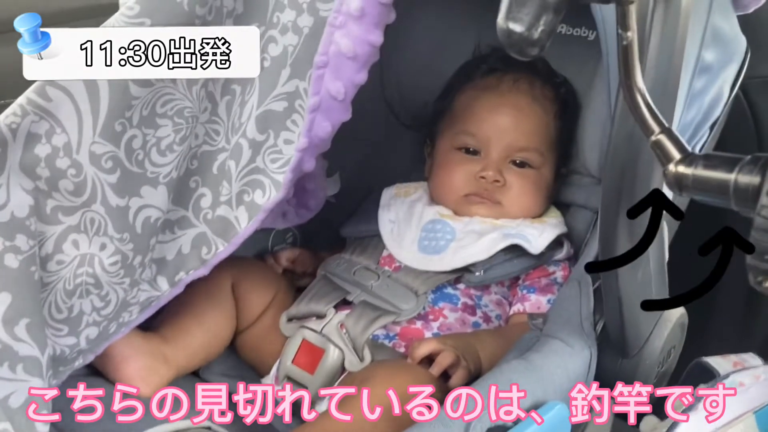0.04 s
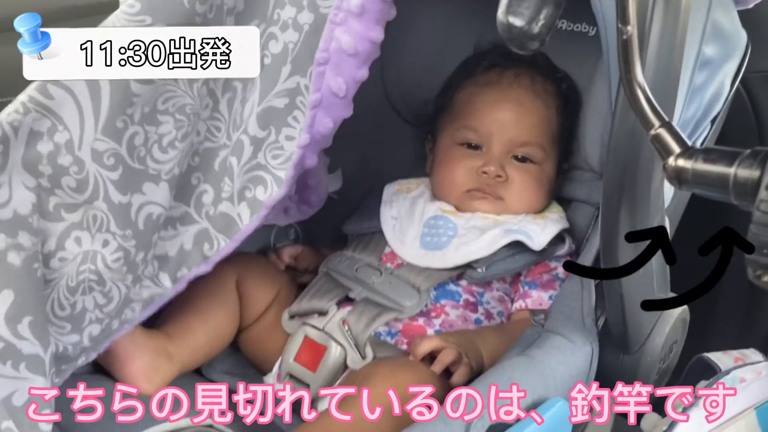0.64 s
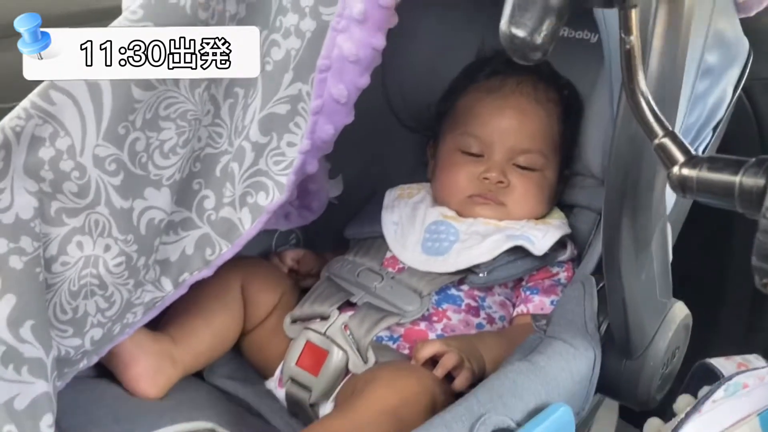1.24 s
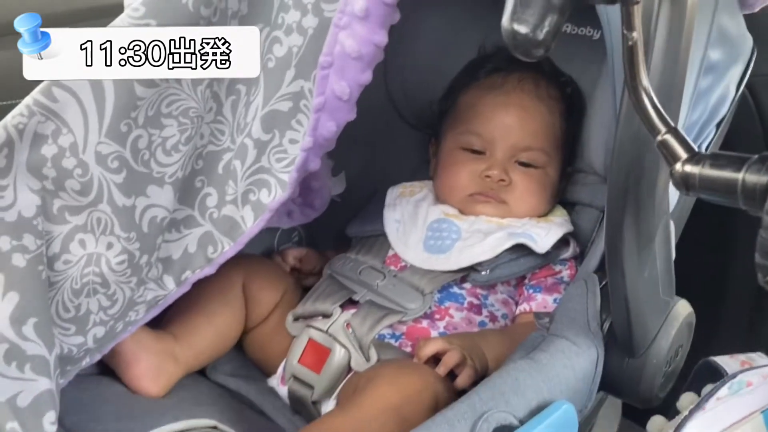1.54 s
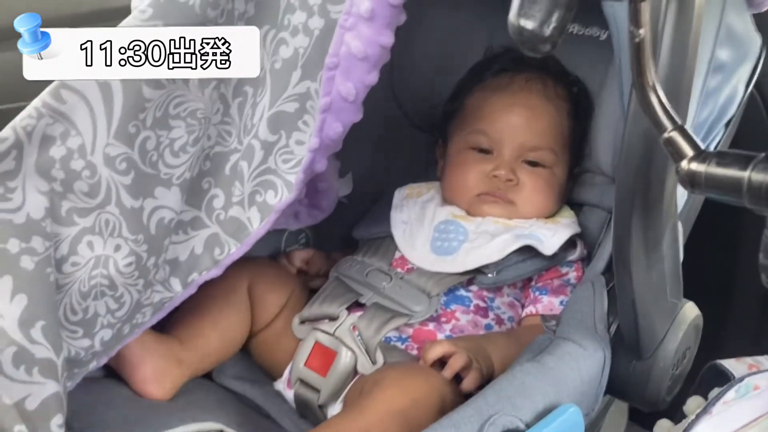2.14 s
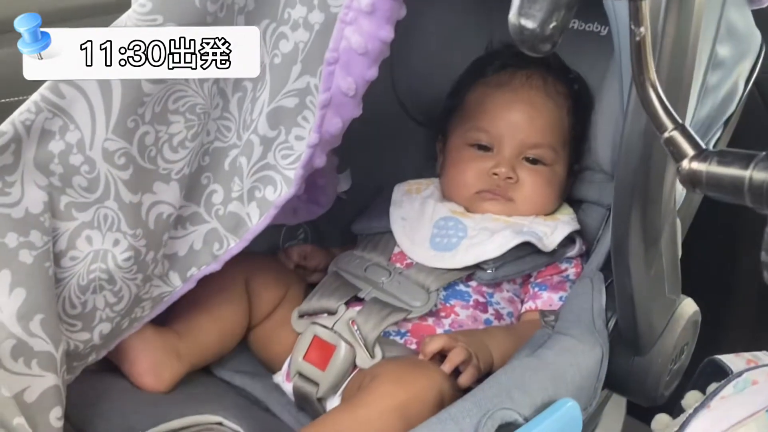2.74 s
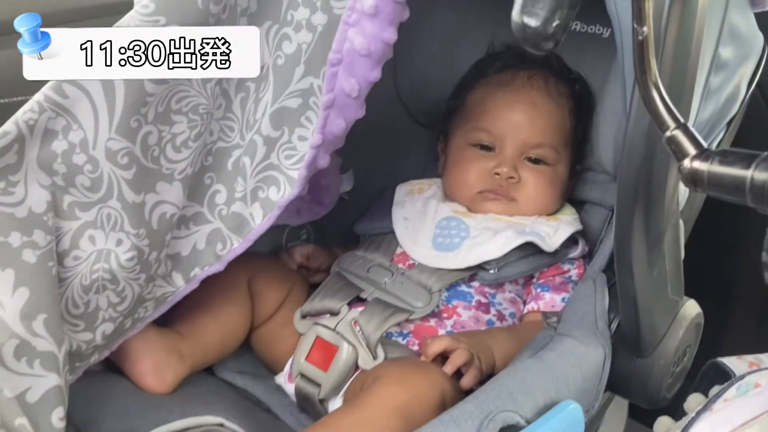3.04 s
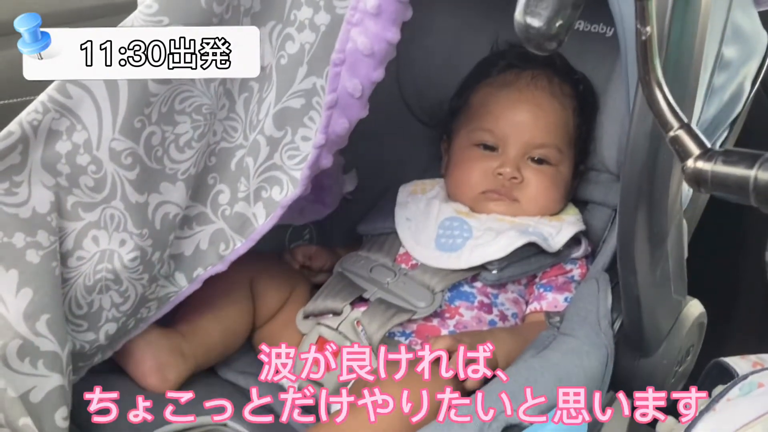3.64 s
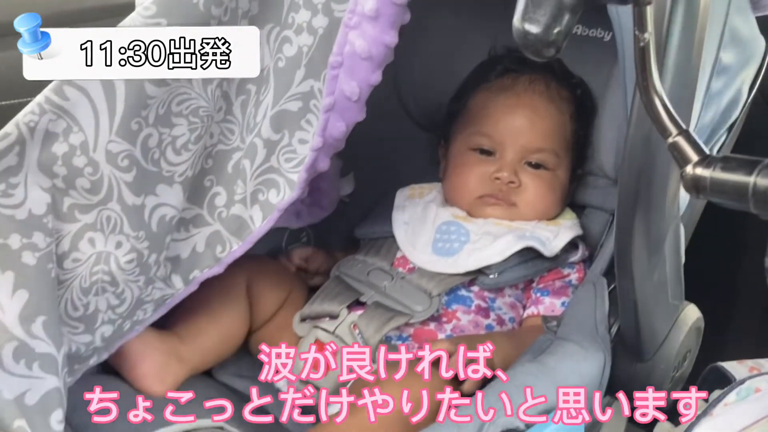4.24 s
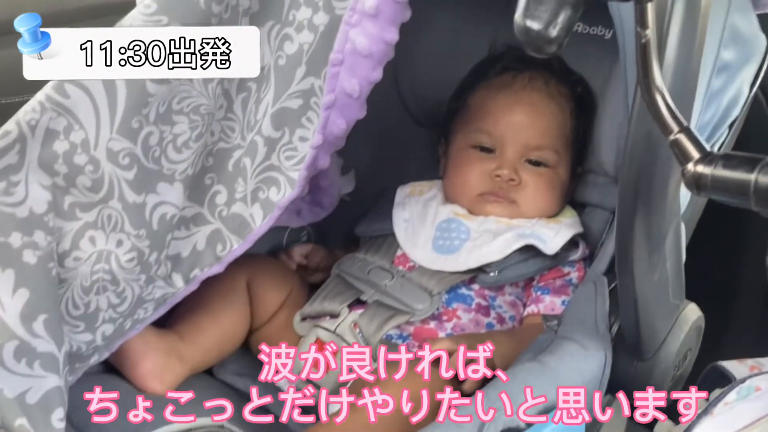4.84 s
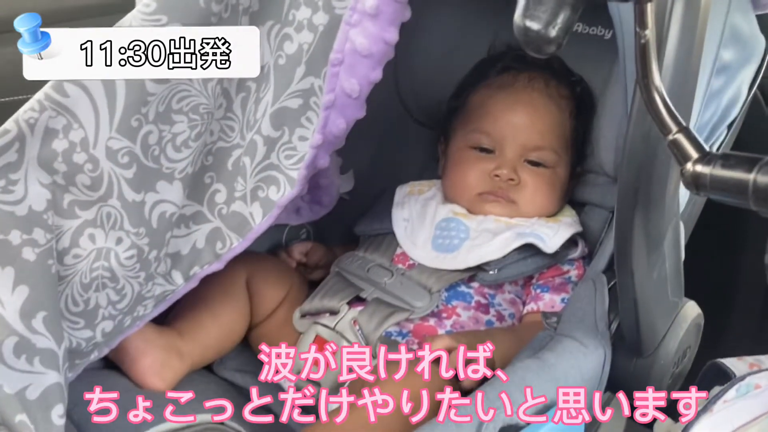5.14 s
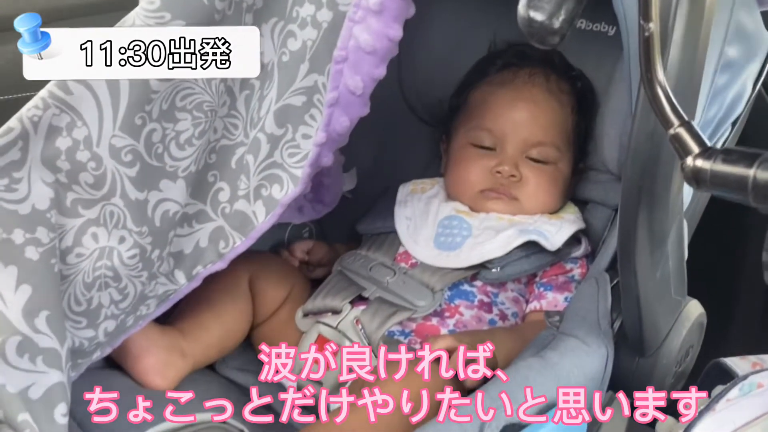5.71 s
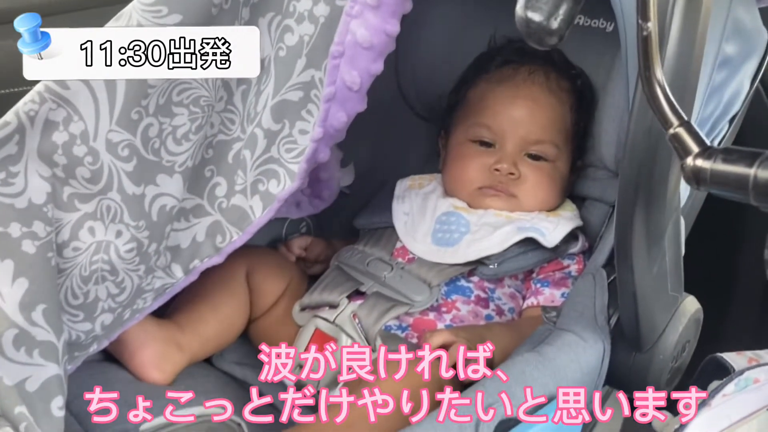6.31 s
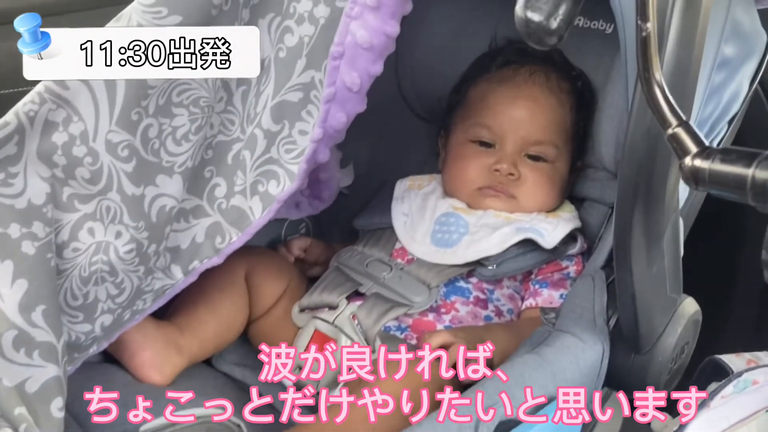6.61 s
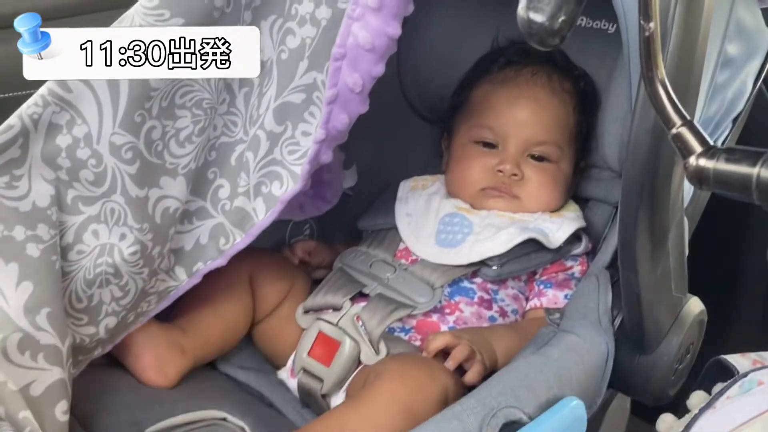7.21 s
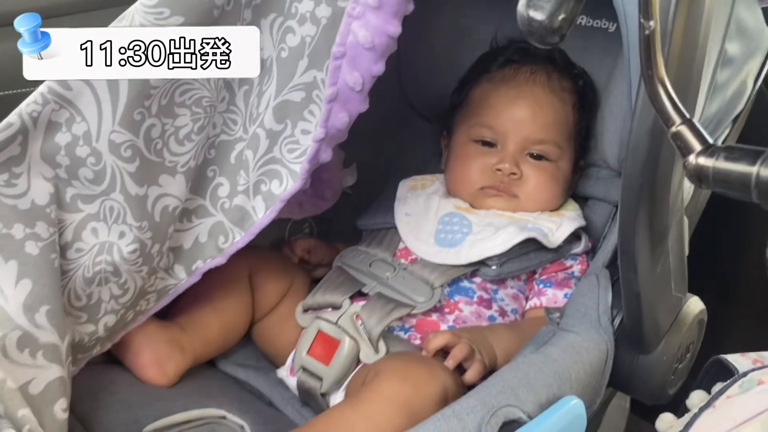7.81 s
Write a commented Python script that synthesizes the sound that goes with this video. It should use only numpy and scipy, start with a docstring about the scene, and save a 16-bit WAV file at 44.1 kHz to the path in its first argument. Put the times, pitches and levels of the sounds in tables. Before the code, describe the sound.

Inside a cruising car, heard from the back seat, a deep road rumble and low tyre hum run throughout, with softer wind roar and airy hiss behind. Near the start, plastic clicks once, sharply and close to the microphone. Midway the engine drone drops at a gear change, then swells again. Rough patches of road add soft low thumps, and the trim ticks very faintly now and then.

```python
"""Inside a cruising car

Road roughness shakes the body into a rumble, and the tyres hum at harmonics of their rotation.
The engine drone drops at an upshift, then swells as its pitch climbs into a cabin resonance.
Behind them lie wind roar and an airy hiss. Plastic clicks once close by, and the trim ticks faintly."""
import sys
import numpy as np
from scipy import signal
from scipy.fft import rfft, irfft
from scipy.io import wavfile

SR = 44100
rng = np.random.default_rng(int(sys.argv[2]) if len(sys.argv) > 2 else 0)


def wav_record(signal):
    """Record a signal, one row per channel, as 16-bit PCM in the file named by sys.argv[1]."""
    frames = np.transpose(np.atleast_2d(signal))
    bounded = np.clip(frames, -1, 1)
    # unit amplitude maps onto the largest positive 16-bit level
    quanta = np.round(bounded * 32767).astype(np.int16)
    wavfile.write(sys.argv[1], SR, quanta)


N = 351036
TIME = np.arange(N) / SR
BINS = np.fft.rfftfreq(N, 1 / SR)


# spectrum of the road rumble through the body: frequency_hz, relative_db
RUMBLE_SPECTRUM = [(20, -31), (32, -23), (46, -19), (68, 0), (80, -2), (115, 2), (140, -3), (175, -7.5),
                   (200, -12.5), (250, -9), (310, -12.5), (395, -13), (520, -26), (1400, -100)]
# rough patches of road: centre_s, level_db, half_length_s
ROUGH_PATCHES = [(0.78, -27.5, 0.075), (1.0, -30.5, 0.063), (2.6, -35, 0.63), (3.806, -31, .05),
                 (4.559, -27, .05), (6.28, -30, 0.16), (6.68, -26.5, .08)]
# spectrum of their boom through the suspension: frequency_hz, relative_db
PATCH_SPECTRUM = [(30, -32), (65, -0.5), (95, 2), (120, 0.5), (160, -12.5), (400, -58), (1200, -100)]

def road_rumble(smooth_db=-30.5, coarse_lift_db=0.96, bumps_db=0.5):
    """Structure-borne noise: the grain of the road shakes the body, and rough patches add a low boom."""
    grain_db = smooth_db + coarse_lift_db * coarseness() + bumps_db * drift(23)
    grain = amp(grain_db) * noise(colour(RUMBLE_SPECTRUM))
    patches = sum(amp(level_db) * np.exp(-0.5 * ((TIME - centre_s) / half_length_s) ** 2)
                  for centre_s, level_db, half_length_s in ROUGH_PATCHES)
    return grain + patches * noise(colour(PATCH_SPECTRUM))


# road speed, given as the pitch of the deepest tyre hum: time_s, pitch_hz
HUM_PITCH = [(0, 56.48), (2, 54.92), (5.5, 55.32), (7.96, 56.82)]
HUM_ORDER = 5  # cycles of that hum per wheel turn
# tones of the rolling tyres: cycles_per_turn, level_db
TYRE_ORDERS = [(5, -37), (6, -47), (15, -53), (20, -45), (25, -57.5)]

def tyre_hum(waver_db=0.7, coarse_db=2.1, smear_cycles=0.0225):
    """Rotational harmonics: uneven tyres hum at multiples of the wheel rate, louder on coarse asphalt."""
    turns = np.cumsum(curve(HUM_PITCH) / HUM_ORDER) / SR
    lift_db = coarse_db * (coarseness() - coarseness().mean())
    out = np.zeros(N)
    for order, mean_db in TYRE_ORDERS:
        pitch_ratio = order / HUM_ORDER
        level_db = mean_db + waver_db * pitch_ratio * drift(5.7) + np.sqrt(pitch_ratio) * lift_db
        smear = smear_cycles * pitch_ratio * drift(4)  # uneven rolling blurs the higher tones
        phase = 2 * np.pi * (order * turns + rng.random() + smear)
        out += amp(level_db) * unit(np.sin(phase))
    return out


# the driver's foot on the pedal: time_s, throttle_fraction
PEDAL = [(0, 1), (1.2, 0.73), (1.9, 0.11), (2.8, .32), (3.3, 1), (5.05, .05), (5.85, .66), (6.4, 0.26),
         (6.75, 0.54), (7.96, .5)]
# low air modes of the cabin: frequency_hz, width_hz, drone_level_db
BOOM_MODES = [(144, 7.5, -29), (166, 10.7, -38)]
LOW_GEAR, HIGH_GEAR = 14.85, 12.275  # firings per wheel turn, before slip
SHIFT_START_S, SHIFT_LENGTH_S, UNLOAD_DB, RELOAD_S = 3.35, 0.55, -14.5, 0.61

def engine_drone(full_throttle_slip=0.07, flutter_db=0.64, octave_db=-23):
    """Forced resonance: the firing tone swells near a cabin mode and sags as the upshift unloads it."""
    shifted = ease(SHIFT_START_S, SHIFT_LENGTH_S)
    gear = LOW_GEAR + (HIGH_GEAR - LOW_GEAR) * shifted
    slip = full_throttle_slip * curve(PEDAL)  # the engine runs ahead of the gearbox
    firing_hz = curve(HUM_PITCH) / HUM_ORDER * gear * (1 + slip)
    since_shift_s = np.maximum(TIME - SHIFT_START_S - SHIFT_LENGTH_S, 0)
    load_db = UNLOAD_DB * shifted ** 2 * np.exp(-since_shift_s / RELOAD_S)
    boom_power = sum(amp(level_db) ** 2 * resonance(firing_hz, mode_hz, width_hz)
                     for mode_hz, width_hz, level_db in BOOM_MODES)
    phase = 2 * np.pi * np.cumsum(firing_hz) / SR
    tone = unit(np.sin(phase) + amp(octave_db) * np.sin(2 * phase))
    return np.sqrt(boom_power) * amp(load_db + flutter_db * drift(7.7)) * tone


# spectrum of the tyre and wind roar: frequency_hz, relative_db
ROAR_SPECTRUM = [(200, -41), (480, 0), (583, -3), (829, -2), (939, -9), (1030, -4), (1250, -9.5),
                 (1540, -11.5), (1690, -14), (2180, -17.5), (2410, -22.5), (3100, -28.5), (6800, -82)]
# spectrum of the airy hiss: frequency_hz, relative_db
HISS_SPECTRUM = [(1800, -33), (3150, -6.5), (3400, 0), (4800, 1.5), (5800, 2), (6500, -0.5), (8400, -3),
                 (9500, -6.5), (11500, -8.5), (13500, -13), (15700, -16.5)]
# narrow upper resonances of the cabin: frequency_hz, width_hz, lift_db
CABIN_RESONANCES = [(840, 37, 1.5), (906, 42, 2.5), (1000, 44, 1), (1564, 27, 6.5), (2180, 28, 5),
                    (2780, 33, 10), (5110, 62, 5.5), (5230, 37, 3.5), (5500, 38, 1), (8600, 170, 1)]

def roar_and_hiss(roar_db=-43.5, gust_db=0.65, hiss_db=-54.5, flicker_db=0.04):
    """Resonant filtering: the cabin colours the broadband roar of tyres and wind, and the hiss above."""
    cabin_db = sum(lift_db * resonance(BINS, mode_hz, width_hz)
                   for mode_hz, width_hz, lift_db in CABIN_RESONANCES)
    roar = amp(roar_db + gust_db * drift(37)) * noise(colour(ROAR_SPECTRUM) + cabin_db)
    hiss = amp(hiss_db + flicker_db * drift(12)) * noise(colour(HISS_SPECTRUM) + cabin_db)
    return roar + hiss


# a click close by: start_s, level_db
PLASTIC_CLICKS = [(.7239, -14)]
# modes of the plastic: frequency_hz, relative_db, t60_s
PLASTIC_MODES = [(2520, -35, 0.034), (2890, -30, 0.028), (4200, -17, 0.0086), (4530, -22, 0.026),
                 (5480, -3, 0.0048), (5750, -1, 0.0046), (7000, -1.5, 0.0038), (7940, -13, 0.0022)]

def plastic_click():
    """Impulse response: plastic rings briefly, so near that the direct sound dominates."""
    return taps(PLASTIC_CLICKS, PLASTIC_MODES, rise_s=0.001, scatter_db=-17, scatter_t60_s=0.045)


# faint ticks of the trim: start_s, level_db
TRIM_TICKS = [(.5127, -54), (2.0128, -51), (3.3094, -52), (4.1465, -54), (4.4742, -51), (4.5765, -54),
              (4.583, -57)]
# modes of the trim: frequency_hz, relative_db, t60_s
TRIM_MODES = [(2800, -2, 0.008), (3460, 6.5, 0.0081), (3850, 1, 0.0065), (5000, 3, 0.0061)]

def trim_ticks():
    """Diffuse reflection: the trim's short ticks arrive mostly as scattered sound."""
    return taps(TRIM_TICKS, TRIM_MODES, rise_s=0.00067, scatter_db=9.5, scatter_t60_s=0.044)


# echoes off nearby surfaces: delay_s, gain_db
EARLY_REFLECTIONS = [(.0029, -9.5), (.0041, -26), (.0059, -18), (.0092, -22), (0.014, -19)]

def taps(events, modes, rise_s, scatter_db, scatter_t60_s):
    """Damped free vibration: each tap rings a few modes, which nearby surfaces echo and scatter."""
    t, out = TIME[:SR // 10], np.zeros(N)
    ring = sum(amp(db - 60 * t / t60_s) * np.sin(2 * np.pi * hz * t) for hz, db, t60_s in modes)
    ring *= 1 - np.exp(-t / rise_s)
    ring /= abs(ring).max()
    for start_s, level_db in events:
        scatter = rng.standard_normal(len(t)) * amp(-60 * t / scatter_t60_s)
        tail = unit(signal.fftconvolve(ring, scatter)[:len(t)]) * ring.std()
        add(out, start_s, amp(level_db) * (ring + amp(scatter_db) * tail))
        for delay_s, gain_db in EARLY_REFLECTIONS:
            add(out, start_s + delay_s, amp(level_db + gain_db) * ring)
    return out


def coarseness(start_s=4.66, end_s=7.9, edge_s=0.85):
    """Surface roughness: 1 on a stretch of coarse asphalt, easing to 0 on either side."""
    return ease(start_s, edge_s) - ease(end_s - edge_s, edge_s)


def resonance(hz, mode_hz, width_hz):
    """Lorentzian curve: 1 at the mode, one half at half a width to either side."""
    return 1 / (1 + (2 * (hz - mode_hz) / width_hz) ** 2)


def amp(db):
    """Amplitude ratio of a level in decibels."""
    return 10 ** (np.asarray(db) / 20)


def unit(x):
    """Normalisation to rms 1."""
    return x / np.sqrt(np.mean(x ** 2) + 1e-20)


def curve(rows):
    """Linear interpolation of a time table at every sample."""
    return np.interp(TIME, *np.transpose(rows))


def ease(start_s, length_s):
    """Raised-cosine step from 0 to 1."""
    return 0.5 - 0.5 * np.cos(np.pi * np.clip((TIME - start_s) / length_s, 0, 1))


def colour(points):
    """Spectral envelope in dB, interpolated over log frequency."""
    hz, db = np.transpose(points)
    return np.interp(np.log(BINS + 1), np.log(hz + 1), db)


def noise(spectrum_db):
    """Spectral shaping: white noise filtered to the given spectrum, at rms 1."""
    return unit(irfft(rfft(rng.standard_normal(N)) * amp(spectrum_db), N))


def drift(rate_hz):
    """Random modulation: noise of rms 1, low-passed at the given rate."""
    rolloff_db = -20 * np.log10(1 + (BINS / rate_hz) ** 4)
    return noise(rolloff_db - 100 * (BINS == 0))  # no steady offset


def add(mix, start_s, sound):
    """Superposition of a sound on the mix from a given time."""
    part = mix[round(start_s * SR):][:len(sound)]
    part += sound[:len(part)]


def scene():
    """Superposition: all the sources sum at the back seat, in one channel."""
    transients = plastic_click() + trim_ticks()
    return (engine_drone() + tyre_hum() + road_rumble() + roar_and_hiss() + transients)[None]


def record(dry):
    """Band limiting: a linear-phase low-pass removes the highest treble."""
    cutoff_hz = 15750
    lowpass = signal.firwin(1023, cutoff_hz, window=("kaiser", 9), fs=SR)
    return signal.oaconvolve(dry, lowpass[None], "same")


dry = scene()
out = record(dry)
wav_record(out)
```